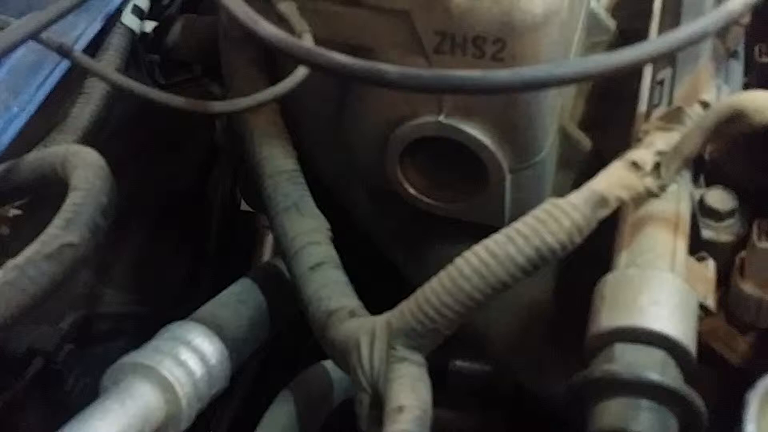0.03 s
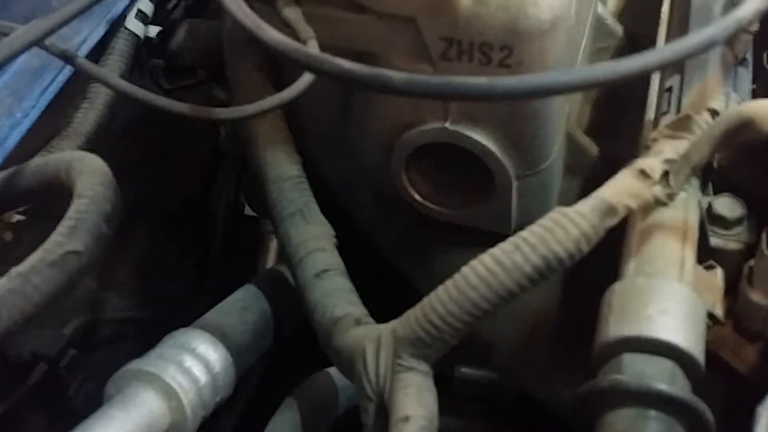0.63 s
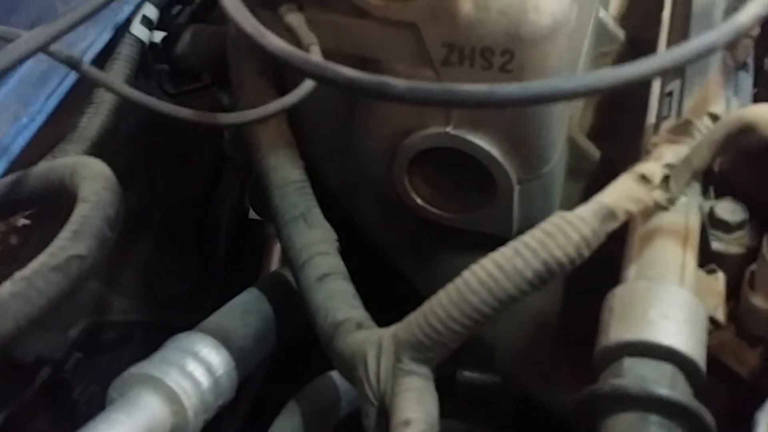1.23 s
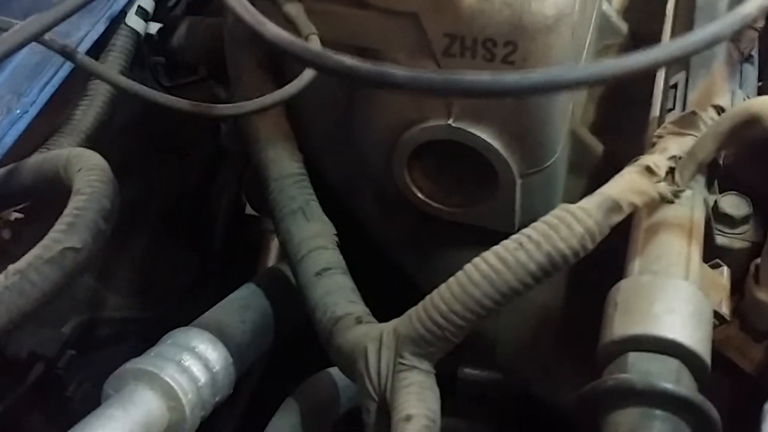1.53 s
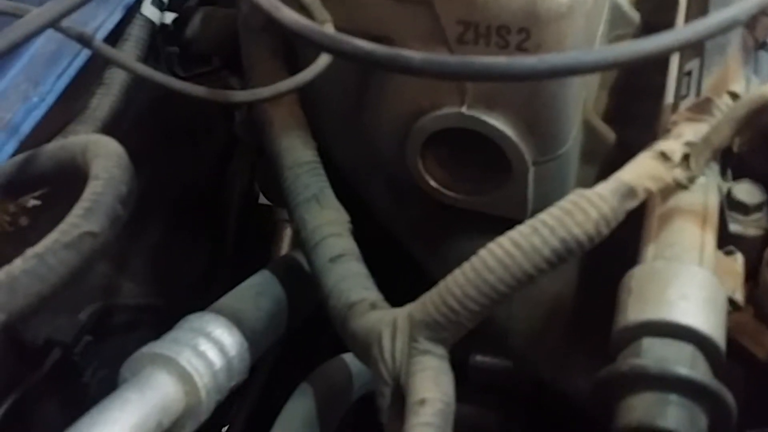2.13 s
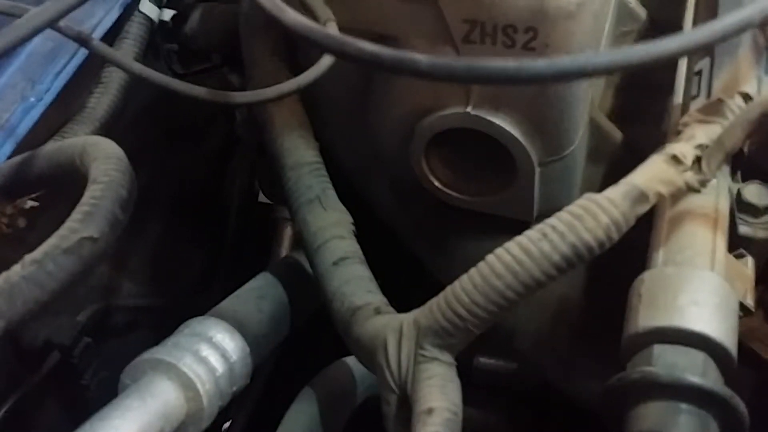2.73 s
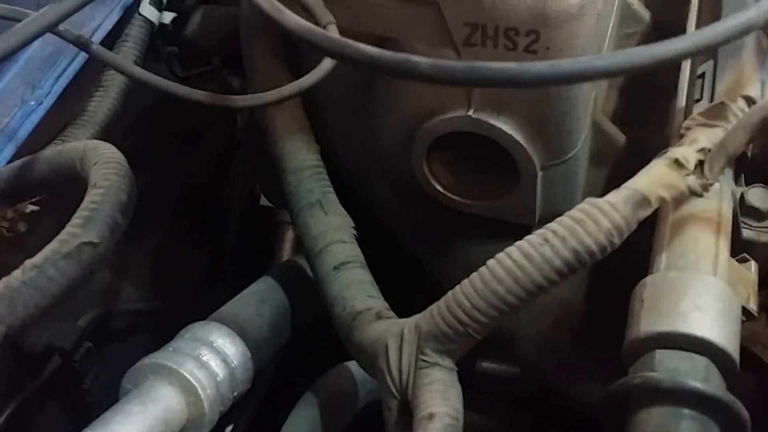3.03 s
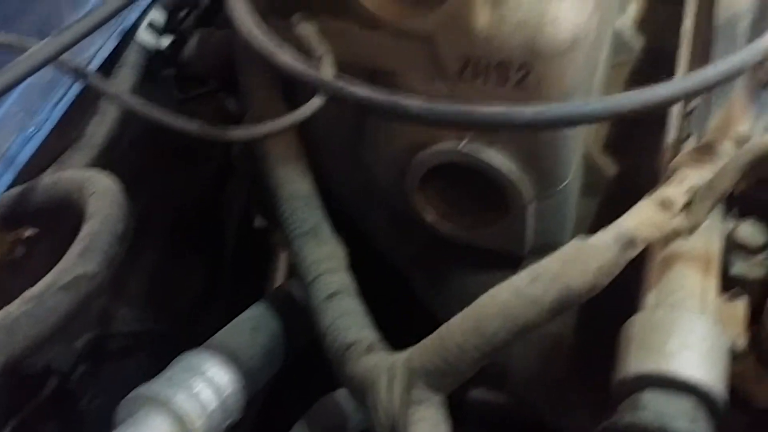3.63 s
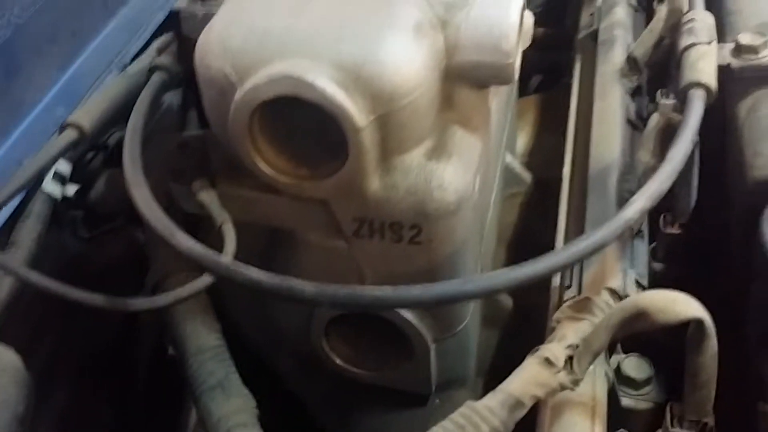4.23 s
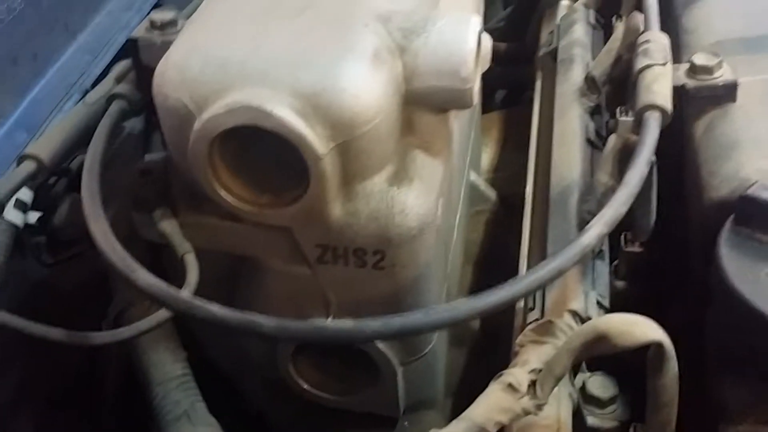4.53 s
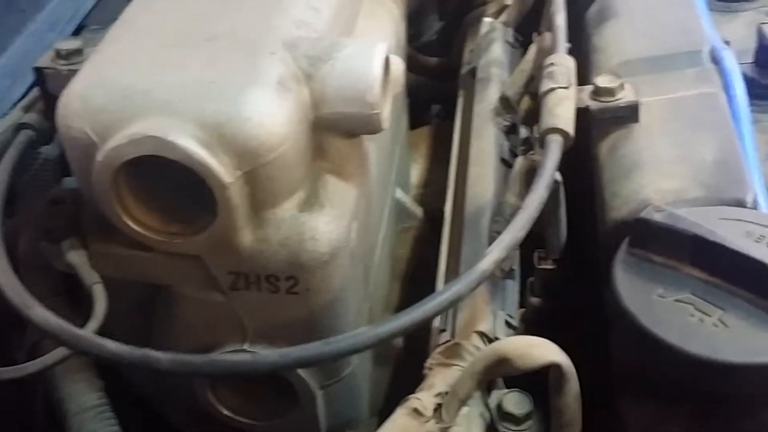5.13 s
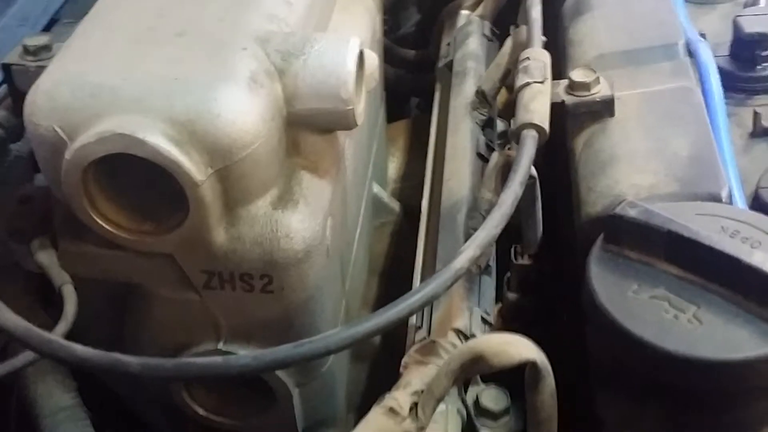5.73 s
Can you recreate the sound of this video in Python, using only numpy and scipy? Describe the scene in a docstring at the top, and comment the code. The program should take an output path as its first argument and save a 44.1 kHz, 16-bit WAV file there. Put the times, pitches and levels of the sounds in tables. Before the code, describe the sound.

Close on an idling car engine: sharp, even tappet ticks and metal knocks ride on a steady throb, gently swelling fan hum and thin whistle.

```python
"""A four-cylinder petrol engine, heard from just above its valve cover, fades in at a 700 rpm idle.
Each camshaft turn brings four sharp tappet ticks, metallic knocks and dull thumps of the block, timed
by the slightly hunting idle, over firing throb, a wash of belts and gears and a thin intake whistle.
The fan hum swells from about 1 s and again from 3.4 s. During the second swell the microphones move
up over the cover, then the low rumble briefly grows fuller before the hum settles back."""
import sys
import numpy as np
from scipy import signal
from scipy.fft import rfft, irfft, next_fast_len
from scipy.io import wavfile
from scipy.ndimage import uniform_filter1d

SR = 44100
rng = np.random.default_rng(int(sys.argv[2]) if len(sys.argv) > 2 else 0)


def transcribe(u):
    """Save the signal u as a 16-bit wav file named by the first command-line argument.

    u: samples, shape (n,) or (channels, n), limited to [-1, 1]; the rate is SR.
    q: integer samples, one column per channel.
    """
    v = np.clip(np.atleast_2d(u).T, -1, 1)
    q = np.round(v * 32767).astype(np.int16)
    wavfile.write(sys.argv[1], SR, q)


N = 263277
TIME = np.arange(N) / SR
FIRST_TICK_S, TURN_COUNT = 0.428, 33  # the camshaft turns are counted from the first tick


def gain_of(db):
    """Decibels to amplitude."""
    return 10 ** (np.asarray(db) / 20)


def unit_rms(x):
    """Scales to rms 1."""
    return x / np.sqrt(np.mean(x ** 2) + 1e-20)


def curve_at(points, hz):
    """Reads a curve on a log-frequency axis."""
    point_hz, value = np.transpose(points)
    return np.interp(np.log(hz + 1), np.log(point_hz + 1), value)


def bump(hz, centre_hz, width_hz):
    """The shape of one resonance, 1 at its top."""
    return 1 / (1 + (2 * (hz - centre_hz) / width_hz) ** 2)


def wander(samples):
    """A random drift of rms 1, smoothed over so many samples."""
    return unit_rms(uniform_filter1d(rng.standard_normal(N), size=samples))


# The hunting idle. Each row: time in seconds, crankshaft speed in rpm.
IDLE_RPM = [(0.59, 691.6), (1.19, 702.3), (1.87, 703.7), (3.14, 695.2), (4.6, 709.2), (5.25, 689.3),
            (5.73, 700.0)]

def cam_turns():
    """Camshaft angle in turns since the first tick; it runs at half the crankshaft's speed."""
    turns = np.cumsum(np.interp(TIME, *np.transpose(IDLE_RPM)) / 60 / 2) / SR
    return turns - np.interp(FIRST_TICK_S, TIME, turns)


# The move up over the cover. Each row: time in seconds, share of the way from 0 to 1.
MIC_PATH = [(3.55, 0), (4.3, 0.95)]

def mic_travel():
    """How far the microphones are from their first position to their second, 0-1."""
    return np.interp(TIME, *np.transpose(MIC_PATH))


# Stereo width: tight low mids, wide treble. Each row: frequency in Hz, left-right correlation.
STEREO_LIKENESS = [(30, -0.2), (80, 0.8), (170, 1), (300, 0.58), (600, 0.84), (1100, -0.08), (2200, 0.23),
                   (4000, 0), (15000, 0)]

def colour(noise, shape_db):
    """Gives a noise pair a minimum-phase EQ of unit power and its stereo width."""
    size = noise.shape[-1]
    hz = np.fft.rfftfreq(size, 1 / SR)
    gain = unit_rms(gain_of(shape_db(hz)))
    log_gain = np.log(np.concatenate([gain, gain[-2:0:-1]]) + 1e-9)
    spectrum = rfft(noise) * np.exp(np.conj(signal.hilbert(log_gain)))[:len(hz)]
    likeness = curve_at(STEREO_LIKENESS, hz)
    left = spectrum[..., 0, :]
    right = likeness * left + np.sqrt(1 - likeness ** 2) * spectrum[..., 1, :]
    return irfft(np.stack([left, right], -2), size)


# Broad EQ of the wash. Each row: frequency in Hz, relative level in dB.
WASH_EQ = [(20, -12), (45, -11.5), (70, -7), (100, -3.5), (135, 1), (200, 0.5), (320, 1.5), (450, -3),
           (650, 3), (1200, -2.5), (2500, -3), (4800, -6), (9200, -7), (11200, -15), (15000, -20.5)]
# Resonances of the cover and engine bay. Each row: centre in Hz, width in Hz, boost in dB.
BAY_PEAKS = [(357, 14, 4), (502.5, 14.4, 5.5), (581, 53, 5), (732, 5.8, 6), (953, 77, 4), (1102, 12, 5),
             (1230, 115, 3), (1396, 30, 8), (1494, 47, 5), (1970, 20, 1.5), (2162, 68, 6.5), (2313, 33, 5),
             (2614, 126, 6), (3160, 150, 4), (4026, 73, 9), (7100, 430, 0), (8900, 350, -0.5)]
# Extra EQ at the second microphone position. Each row: centre in Hz, width in Hz, gain in dB.
BAY_PEAKS_MOVED = [(533, 120, -1.5), (830, 200, 1), (2700, 120, 2), (4060, 110, -3), (5100, 500, 2)]

def belt_wash(turns, level_db=-23.5, repeating_share=0.36, grain_db=1.35):
    """Belts and gears: fine rattle, part of it repeating with every turn, coloured by the bay."""
    turn_samples = round(N / (turns[-1] - turns[0]))
    place_in_turn = (turns % 1 * turn_samples).astype(int) % turn_samples
    pattern = rng.standard_normal((2, turn_samples))[:, place_in_turn]
    fresh = rng.standard_normal((2, N))
    rattle = np.sqrt(repeating_share) * pattern + np.sqrt(1 - repeating_share) * fresh
    rattle *= gain_of(grain_db * wander(samples=90))
    rattle = np.pad(rattle, ((0, 0), (0, 2 * next_fast_len(N // 2 + 1) - N)))
    peaks = lambda hz, rows: sum(db * bump(hz, centre, width) for centre, width, db in rows)
    first_eq = lambda hz: curve_at(WASH_EQ, hz) + peaks(hz, BAY_PEAKS)
    second_eq = lambda hz: first_eq(hz) + peaks(hz, BAY_PEAKS_MOVED)
    first, second = (colour(rattle, eq)[:, :N] for eq in (first_eq, second_eq))
    return gain_of(level_db) * unit_rms(first + mic_travel() * (second - first))


# The two swells of the fan hum. Each row: start in seconds, end in seconds, rise time in seconds.
FAN_SWELLS = [(1.086, 2.68, 0.29), (3.4, 5.287, 0.63)]

def fan_swell(fall_s=0.31):
    """How far the fan hum has swollen, 0-1: a rise, a hold and a fall."""
    return sum(np.clip(np.minimum((TIME - start) / rise_s, (end - TIME) / fall_s), 0, 1)
               for start, end, rise_s in FAN_SWELLS)


# Level ride of the octave above the blade tone. Each row: time in seconds, level in dB.
FAN_OCTAVE_RIDE = [(1, -42), (2.2, -44), (2.8, -51), (4.3, -46), (4.75, -37), (5.2, -41.5), (5.9, -41)]

def fan_hum(blade_hz=151.1, level_db=-39, swell_hz=1.0, swell_db=8.5, waver_hz=0.36):
    """The blade tone grows louder and slightly sharper in each swell, with a weak octave."""
    swell = fan_swell()
    pitch_hz = blade_hz + swell_hz * swell + waver_hz * wander(samples=8000)
    phase = 2 * np.pi * np.cumsum(pitch_hz) / SR
    blade_tone = gain_of(level_db + swell_db * swell) * np.sin(phase)
    octave = gain_of(np.interp(TIME, *np.transpose(FAN_OCTAVE_RIDE))) * np.sin(2 * phase)
    return np.sqrt(2) * (blade_tone + octave)


# Whistle tones. Each row: pitch in Hz, relative level in dB at the first microphone position,
# then at the second.
WHISTLE_TONES = [(6136, -35.5, -37), (6385, -43, -36.5)]

def intake_whistle(width_hz=110, level_db=-3, swell_db=3.0):
    """Air drawn past the throttle sings in two fuzzy tones, which swell along with the hum."""
    hz, travel, out = np.fft.rfftfreq(N, 1 / SR), mic_travel(), np.zeros((2, N))
    for tone_hz, first_db, second_db in WHISTLE_TONES:
        tone = unit_rms(irfft(rfft(rng.standard_normal((2, N))) * bump(hz, tone_hz, width_hz), N))
        out += gain_of(first_db + travel * (second_db - first_db)) * tone
    return gain_of(level_db + swell_db * fan_swell()) * out


def low_rumble(peak_s=4.68, half_length_s=0.27, centre_hz=225, width_hz=110, level_db=-36):
    """The low rumble grows fuller for a moment, at the top of the second swell."""
    band = bump(np.fft.rfftfreq(N, 1 / SR), centre_hz, width_hz) ** 2
    rumble = unit_rms(irfft(rfft(rng.standard_normal(N)) * band, N))
    return gain_of(level_db) * np.exp(-((TIME - peak_s) / half_length_s) ** 2) * rumble


# Partials of the throb. Each row: multiple of the camshaft rate, level in dB.
THROB_ORDERS = [(12, -65), (16, -51), (20, -50), (23, -47.5), (24, -47.5), (28, -46.5), (35, -51),
                (46, -46), (47, -44), (52, -45), (61, -48), (64, -44)]

def firing_throb(turns):
    """The firing cycle hums in low partials locked to the camshaft."""
    return sum(gain_of(db) * np.sqrt(2) * np.cos(2 * np.pi * (order * turns + rng.random()))
               for order, db in THROB_ORDERS)


def every_turn(offset_s, sounds, force_db, spread_db, jitter_s):
    """Places a contact at the same cam angle of every turn, a little uneven in force and time."""
    turns, out = cam_turns(), np.zeros((2, N))
    angle = offset_s * turns[-1] / (TIME[-1] - FIRST_TICK_S)  # offset_s holds at the mean speed
    times = np.interp(np.arange(TURN_COUNT) + angle, turns, TIME, right=2 * TIME[-1])
    scatter = rng.standard_normal((TURN_COUNT, 2))
    for s, sound, db, (force, slip) in zip(times, sounds, force_db * np.ones(TURN_COUNT), scatter):
        start = max(round((s + jitter_s * slip) * SR), 0)
        slot = out[:, start:start + sound.shape[1]]
        slot += gain_of(db + spread_db * force) * sound[:, :slot.shape[1]]
    return out


# Dull thumps. Each row: seconds into the turn, relative level in dB, pitch in Hz, t60 in seconds.
BLOCK_THUMPS = [(.0205, -22.5, 648, 0.028), (.0240, -21.5, 257, 0.062), (.0310, -25.5, 745, 0.049),
                (.0680, -23.5, 598, 0.039), (.0600, -21.5, 362, 0.054), (.0670, -21, 290, 0.023),
                (.0780, -22.5, 663, 0.035), (.0860, -29, 208, 0.037), (.1020, -25, 304, 0.044),
                (.1080, -25, 572, 0.045), (0.1146, -26.5, 282, 0.048), (.1460, -24.5, 595, 0.05),
                (0.155, -25, 357, 0.016)]

def block_thumps(level_db=1.0, rise_s=0.0027, moved_db=-1.0):
    """Pistons and cams load the block, which answers with short low rings."""
    t, out = np.arange(4096) / SR, np.zeros((2, N))
    for offset_s, db, hz, t60 in BLOCK_THUMPS:
        right_phase = np.arccos(curve_at(STEREO_LIKENESS, hz)) * rng.choice([-1, 1])  # stereo width
        envelope = (1 - np.exp(-t / rise_s)) * gain_of(level_db + db - 60 * t / t60)
        ring = envelope * np.sin(2 * np.pi * hz * t + np.array([[0], [right_phase]]))
        out += every_turn(offset_s, [ring] * TURN_COUNT, force_db=0, spread_db=2.5, jitter_s=0.00024)
    return gain_of(moved_db * mic_travel()) * out


# Modes of the valve cover. Each row: pitch in Hz, width in Hz, relative level in dB at the first
# microphone position, then at the second.
COVER_MODES = [(1970, 63, -25, 0), (2295, 44, 5, 4), (2630, 62, 2.5, 4), (3380, 140, 3, -2),
               (4050, 89, 8, 2), (7020, 180, -10, -4), (9500, 86, -6.5, -7)]

def cover_ring(contacts, level_db=-1):
    """The cast cover rings on after each contact; the mix of modes follows the microphones."""
    size = 2 * next_fast_len(N // 2 + 2048)
    hz, spectrum = np.fft.rfftfreq(size, 1 / SR), rfft(contacts, size)
    travel, out = mic_travel(), np.zeros((2, N))
    for mode_hz, width_hz, first_db, second_db in COVER_MODES:
        ring = irfft(spectrum / (1 + 2j * (hz - mode_hz) / width_hz), size)[:, :N]
        out += gain_of(level_db + first_db + travel * (second_db - first_db)) * ring
    return out


def burst(t, rise_s, t60, tail_db, tail_t60):
    """A quick rise, a fast decay and a weaker tail of reflections from the engine bay."""
    t = np.maximum(t, 0)
    direct, tail = gain_of(-60 * t / t60), gain_of(tail_db - 60 * t / tail_t60)
    return (1 - np.exp(-t / rise_s)) * np.hypot(direct, tail)


def chatter(envelope, shape_db, repeating_share):
    """One burst of metal chatter for each turn, partly the same each time."""
    pattern = rng.standard_normal((2, len(envelope)))
    fresh = rng.standard_normal((TURN_COUNT, 2, len(envelope)))
    noise = np.sqrt(repeating_share) * pattern + np.sqrt(1 - repeating_share) * fresh
    return unit_rms(colour(noise * envelope, shape_db)) * np.sqrt(np.mean(envelope ** 2))


def turn_force(accents, uneven_db):
    """Strength of a contact in each turn, in dB: a little uneven, with a few hard turns."""
    force_db, turns = uneven_db * rng.standard_normal(TURN_COUNT), cam_turns()
    for s, db in accents:
        force_db[int(np.interp(s, TIME, turns))] += db
    return force_db


# Metallic knocks. Each row: seconds into the turn, relative level in dB, ring pitch in Hz,
# boost or cut at that pitch in dB.
VALVE_KNOCKS = [(0.0098, -30, 1640, 30), (0.0388, -23.5, 3430, 18.5), (0.0442, -18, 2725, 11.5),
                (0.049, -15.5, 2520, 8), (.0528, -18.5, 2280, 14), (0.0577, -19.5, 2460, 10),
                (.0655, -28.5, 6800, 13), (0.1065, -19.5, 2586, 15), (.1380, -23.5, 4050, 10),
                (.1445, -28, 2154, 21), (.1505, -26, 6210, -15), (.0220, -30, 4100, -5),
                (.0950, -22.5, 4000, 8)]
# EQ shared by the knocks. Each row: frequency in Hz, relative level in dB.
KNOCK_EQ = [(300, -30), (700, -4), (1500, -5.5), (2300, -3.5), (3000, 1.5), (3400, -1.5), (4500, -3.5),
            (7000, -5), (9000, -22), (11000, -9.5), (15000, -28)]
# Turns that knock harder. Each row: time in seconds, extra level in dB.
KNOCK_ACCENTS = [(.99, 2), (3.91, 1.5), (4.58, 1)]

def valve_knocks(ring_width_hz=330, level_db=0.98, moved_db=-0.1):
    """Slack in the valve train rattles the cover at set cam angles."""
    t, out = np.arange(2048) / SR, np.zeros((2, N))
    envelope = burst(t, rise_s=0.0008, t60=0.02, tail_db=-17, tail_t60=0.07)
    force_db = turn_force(KNOCK_ACCENTS, uneven_db=0.1)
    for offset_s, db, ring_hz, ring_db in VALVE_KNOCKS:
        eq = lambda hz: curve_at(KNOCK_EQ, hz) + ring_db * bump(hz, ring_hz, ring_width_hz)
        knocks = gain_of(level_db + db) * chatter(envelope, eq, repeating_share=0.48)
        out += every_turn(offset_s, knocks, force_db, spread_db=0.6, jitter_s=0.0003)
    return gain_of(moved_db * mic_travel()) * out


# The four tappets, loosest first. Each row: seconds into the turn, level in dB, relative level of the
# light contact in dB, its lead in seconds, left over right in dB, then two rings, each as pitch in Hz
# and boost in dB.
TAPPET_HITS = [(.0011, -12.5, -4, .0027, 3.5, 9100, 6.5, 4340, -1),
               (.0443, -16, -2.5, .0025, 3, 7220, 5, 5760, 10.5),
               (.0873, -19, 1.5, .0024, 2.5, 7100, 8, 9400, 4.5),
               (.1294, -14.5, -7.5, .0023, 4.5, 12900, 7, 7200, 4)]
# Bright EQ shared by the ticks. Each row: frequency in Hz, relative level in dB.
TICK_EQ = [(300, -46), (1000, -10), (1700, 0), (2800, -3), (4000, -3), (5000, -0.5), (6500, 0), (9000, 3.5),
           (10500, -2.5), (13500, -1.5), (15000, -19)]
# Turns in which the loosest tappet ticks harder. Each row: time in seconds, extra level in dB.
TICK_ACCENTS = [(2.67, 2.5), (4.21, 2), (4.38, 1)]

def tappet_ticks(ring_width_hz=650):
    """Each tappet takes up its clearance with a light contact, then hits home."""
    t, out = np.arange(2048) / SR, np.zeros((2, N))
    for k, (offset_s, db, touch_db, lead_s, pan_db, hz1, db1, hz2, db2) in enumerate(TAPPET_HITS):
        touch = gain_of(touch_db) * burst(t, rise_s=0.00074, t60=0.029, tail_db=-13.5, tail_t60=0.035)
        hit = burst(t - lead_s, rise_s=0.0008, t60=0.019, tail_db=-17, tail_t60=0.07)
        rings = lambda hz: db1 * bump(hz, hz1, ring_width_hz) + db2 * bump(hz, hz2, ring_width_hz)
        eq = lambda hz: curve_at(TICK_EQ, hz) + rings(hz)
        force_db = turn_force(TICK_ACCENTS, uneven_db=1.5) if k == 0 else 0  # loosest is least even
        ticks = chatter(np.hypot(touch, hit), eq, repeating_share=0.52)
        ticking = every_turn(offset_s - lead_s, ticks, force_db, spread_db=0.94, jitter_s=0.0002)
        out += gain_of(db + np.array([[pan_db], [-pan_db]]) / 2) * ticking
    return out


def scene():
    """The idling engine: clatter timed by one camshaft, over a bed of hum and noise."""
    turns = cam_turns()
    contacts = tappet_ticks() + valve_knocks()
    clatter = contacts + cover_ring(contacts) + block_thumps()
    bed = firing_throb(turns) + fan_hum() + belt_wash(turns) + intake_whistle() + low_rumble()
    return clatter + bed


# Tonal lean of the microphone pair. Each row: frequency in Hz, left over right in dB.
MIC_BALANCE = [(100, -3), (290, 1.5), (420, -7.5), (600, -1.5), (1100, -1), (2100, -5), (2800, 0),
               (4200, 2), (5400, 3), (7100, 6.5), (8400, -7.5), (9400, -3.5), (10700, -2), (13000, -1)]
# The fade-in, silent before its first row. Each row: time in seconds, gain in dB.
FADE_IN = [(.55, -66), (0.568, -23.5), (.61, -16.5), (.68, -8.5), (.76, -4.5), (.85, -1.5), (1.0, -1.5)]

def record(dry, cutoff_hz=14800):
    """Two microphones of unlike colour, a fade-in and a high cut."""
    lean_db = curve_at(MIC_BALANCE, np.fft.rfftfreq(N, 1 / SR))
    heard = irfft(rfft(dry) * gain_of(np.array([lean_db, -lean_db]) / 2), N)
    fade_s, fade_db = np.transpose(FADE_IN)
    heard *= gain_of(np.interp(TIME, fade_s, fade_db)) * (TIME > fade_s[0])
    low_pass = signal.firwin(301, cutoff_hz, window=("kaiser", 9), fs=SR)
    return signal.oaconvolve(heard, low_pass[None], "same")


dry = scene()
out = record(dry)
transcribe(out)
```